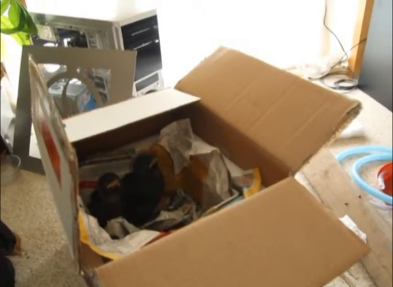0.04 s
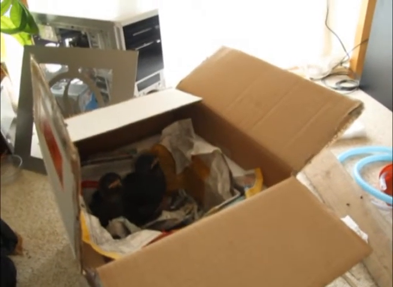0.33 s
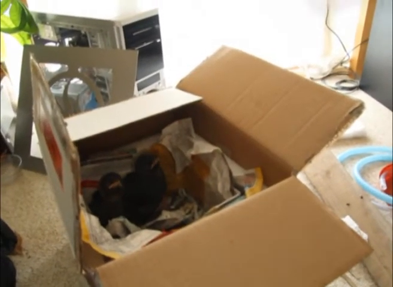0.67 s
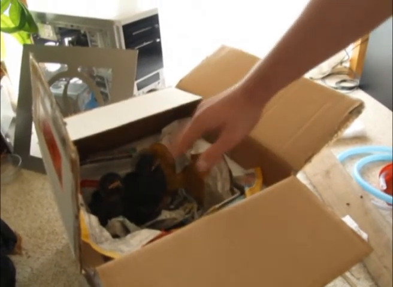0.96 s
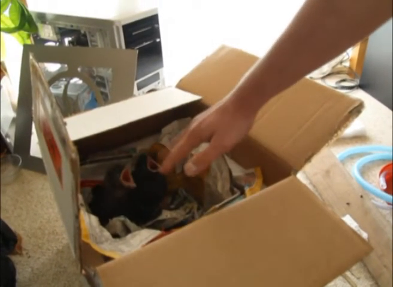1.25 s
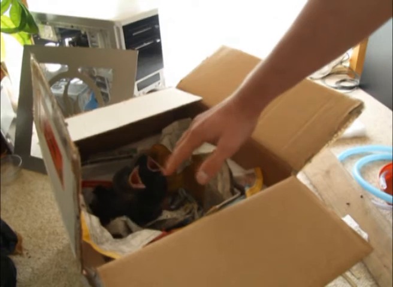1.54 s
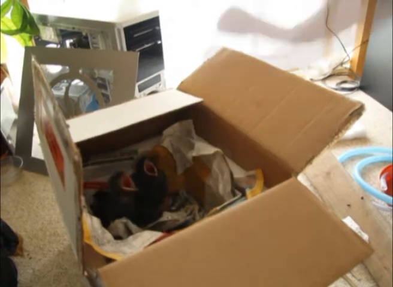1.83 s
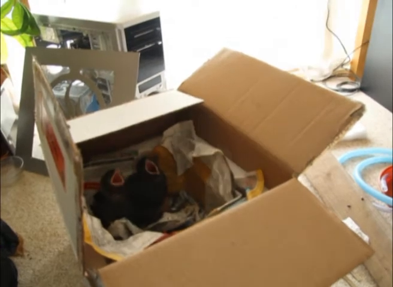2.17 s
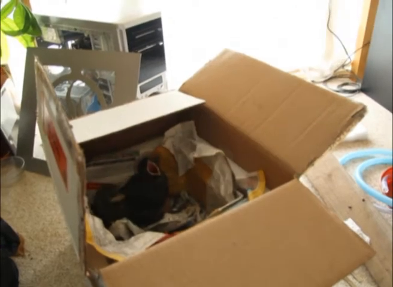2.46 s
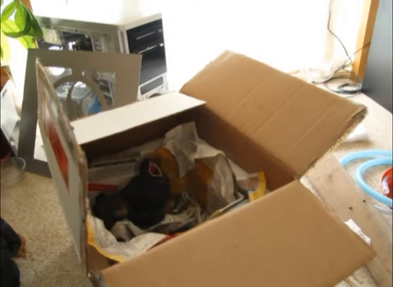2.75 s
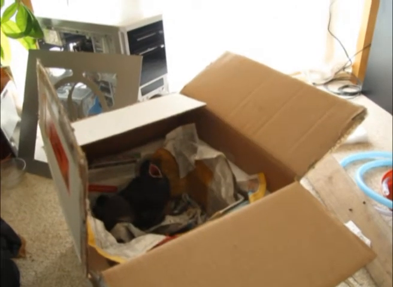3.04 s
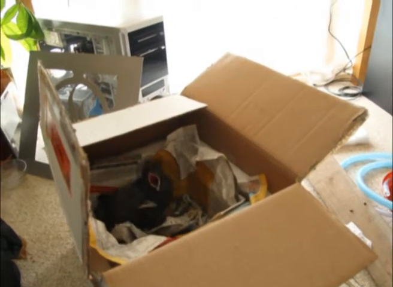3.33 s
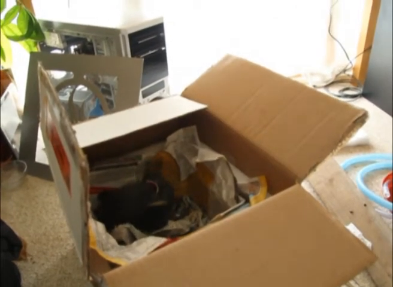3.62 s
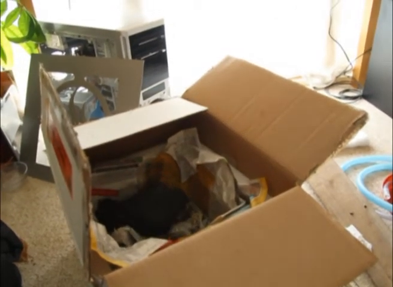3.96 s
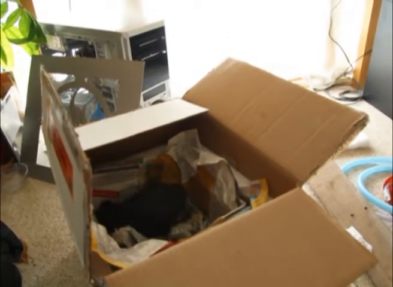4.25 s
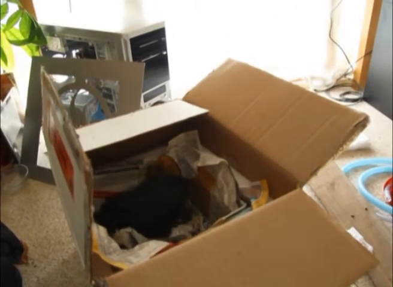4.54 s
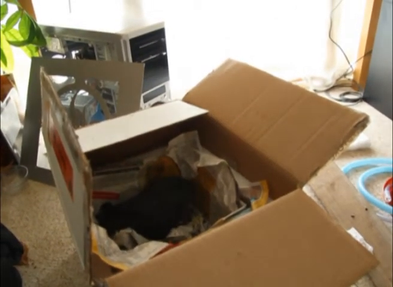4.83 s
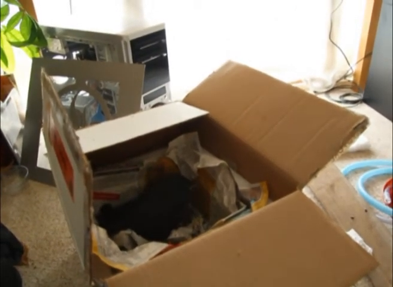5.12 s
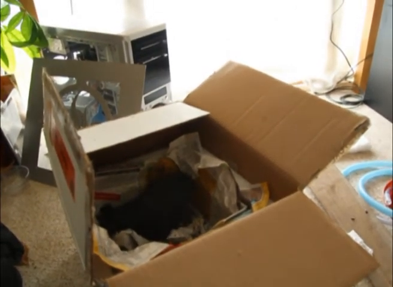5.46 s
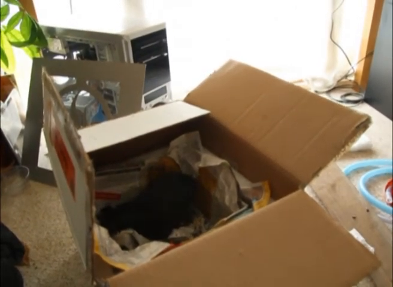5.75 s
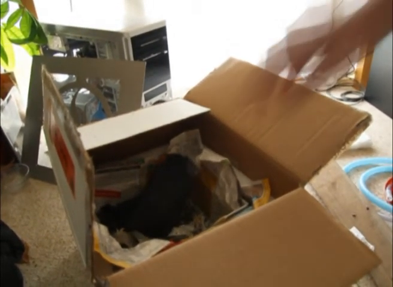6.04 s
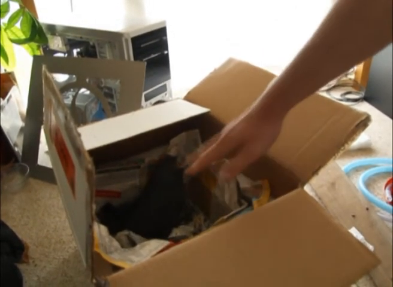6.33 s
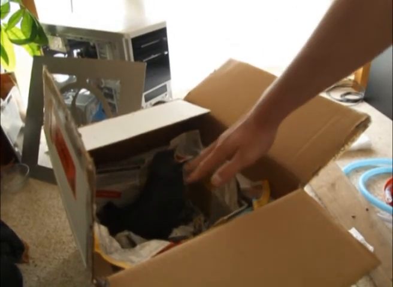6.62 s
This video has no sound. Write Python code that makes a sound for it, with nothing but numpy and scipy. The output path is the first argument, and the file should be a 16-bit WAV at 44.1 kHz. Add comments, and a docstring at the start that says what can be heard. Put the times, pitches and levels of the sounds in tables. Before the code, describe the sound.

Close, rasping squawks of hungry chicks in a cardboard box, pausing briefly for light shuffling on paper over a low room hum.

```python
"""Indoors, close to a cardboard box of jackdaw chicks, on one microphone. They beg from a hand with
seven loud squawks: each cracks open, locks briefly into a whistle or a buzz, then breaks into a
chaotic rasp. The chicks shuffle on paper bedding, clop their beaks and bump the box; clothes swish
over a low hum. The recorder's gain control clamps down on the squawks, then lets the room swell back."""
import sys
import numpy as np
from scipy import signal
from scipy.fft import rfft, irfft
from scipy.io import wavfile
from scipy.ndimage import uniform_filter1d, minimum_filter1d, map_coordinates

SR = 44100
rng = np.random.default_rng(int(sys.argv[2]) if len(sys.argv) > 2 else 0)


def int16_out(signal):
    """Quantize to a 16-bit WAV file."""
    q = np.round(np.clip(np.atleast_2d(signal).T, -1, 1) * 32767)
    wavfile.write(sys.argv[1], SR, q.astype(np.int16))


N = 295029
TIME = np.arange(N) / SR
FREQS = np.fft.rfftfreq(4096, 1 / SR)
SPLIT_HZ = 3500  # a sound's core lies below this, its treble above


def chicks():
    """Seven begging squawks, each through its own shape of throat and open beak."""
    # Each row: start and end in seconds, effort in dB, opening swell in dB, effort drift in dB/s,
    # treble against core in dB, its drift in dB/s, fade in seconds, throat lift and sag as fractions.
    calls = [(1.152, 1.785, -10.5, 15, -1.5, -0.5, -6, 0.012, .12, 0.04),
             (1.962, 2.258, -4.5, 17.5, -23.5, -3, -5.5, 0.025, 0, 0.01),
             (2.607, 3.005, -8.5, 15, -10, -1.15, -12, 0.016, 0.04, 0.03),
             (3.373, 4.055, -11, 13.5, 2, -4, -7, 0.018, 0.05, 0.04),
             (5.254, 5.578, -15, 14.5, -11.5, -.6, -27, 0.017, .01, .09),
             (5.976, 6.25, -14, 21.5, -11, -3.4, -17, 0.019, 0.04, 0.07),
             (6.321, 6.72, -10.5, 15.5, 15.5, -4.5, 0.5, 0.013, 0.06, 0.01)]
    # One list of resonances a squawk. Each row: centre in Hz, width in Hz, relative level in dB.
    throats = [
        [(645, 170, -27.5), (1600, 240, -7.5), (2043, 190, 0), (2580, 496, 1.2), (5070, 1500, -9.5),
         (5540, 390, -8), (6790, 290, -10.5), (8050, 1270, -12.5), (10220, 990, -15), (12700, 2100, -21)],
        [(645, 140, -35.5), (1370, 120, -24), (1990, 306, -11.5), (2690, 390, -4.5), (3900, 1000, -17.5),
         (5580, 950, -8.5), (7120, 480, -12), (8360, 1000, -14.5), (10110, 1300, -16.5), (12800, 2500, -22)],
        [(610, 180, -32.5), (1966, 216, -11.5), (2750, 516, -7.5), (3960, 350, -14.5), (5640, 770, -5.5),
         (7120, 650, -9.5), (8420, 840, -14), (10000, 2100, -15), (13710, 2400, -24)],
        [(663, 330, -29), (1440, 70, -22.5), (2104, 230, -0.9), (2650, 550, -3.5), (3830, 170, -15),
         (5440, 890, -11.5), (6830, 970, -13.5), (8450, 510, -17.5), (9550, 1470, -17.5), (12900, 2300, -26)],
        [(730, 293, -20), (1520, 370, -10), (1942, 266, -5.2), (2980, 340, -2), (3800, 850, -9.5),
         (4630, 140, -9), (6620, 1170, -0.5), (7850, 500, -8), (9100, 2050, -7), (13100, 1600, -16.5)],
        [(682, 210, -23.5), (1460, 260, -9.5), (2030, 470, -6.5), (3680, 1070, -9), (4370, 220, -16),
         (6070, 890, -11), (7400, 1840, -23), (9030, 580, -19), (12500, 770, -21.5), (14520, 2790, -37)],
        [(729, 230, -34), (1400, 184, -6), (2454, 566, 4.5), (3150, 440, -3), (3860, 520, -14),
         (4730, 880, -15.5), (5950, 1100, -10.5), (6640, 2700, -11.5), (9100, 3700, -18), (12030, 580, -24)],
    ]
    out = np.zeros(N)
    for call, throat in zip(calls, throats):
        add(out, call[0], squawk(throat, *call))
    return out


def squawk(throat, start, end, db, swell_db, drift, bright_db, bright_drift, fade, lift, sag):
    """Effort swells, drifts and fades while the syrinx slips between locked and chaotic states."""
    # The chick pushes or falters. Each row: centre and half width in seconds, change of effort in dB.
    surges = [(1.68, .04, 1), (2.071, 0.037, -2.1), (2.865, 0.029, -2.5), (3.796, 0.032, -5.5),
              (3.92, 0.059, 1.5)]
    swell_s, attack_s, release_s = 0.013, 0.0016, 0.011
    t = np.arange(start, end, 1 / SR)
    age, left = t - start, end - t
    fading = np.exp(-left / fade)
    effort = db - swell_db * np.exp(-age / swell_s) + drift * age - 17.5 * fading
    effort += sum(push_db * np.exp(-((t - s) / width) ** 2) for s, width, push_db in surges)
    crack_db = 9 * np.exp(-age / 0.038)  # extra treble as the beak snaps open
    bright = bright_db + bright_drift * age + crack_db - 7.5 * fading  # the treble fades first
    tension = 1 + lift * np.exp(-age / 0.09) - sag * np.exp(-left / 0.045)  # starts tight, ends slack
    hz, rough, fundamental_db, core_db, treble_db = syrinx(t)
    tone = locked_tone(t, throat, hz, rough, fundamental_db)
    core, treble = np.sqrt(1 - rough ** 2) * tone + rough * rasp(t, throat, tension)
    treble *= 1 - np.exp(-age / 0.0058)  # the pulses sharpen as pressure builds
    gate = np.clip(age / attack_s, 0, 1) * np.clip(left / release_s, 0, 1)
    return gate * amp(effort) * (amp(core_db) * core + amp(bright + treble_db) * treble)


def syrinx(t, lock_s=0.01):
    """Pitch, roughness and three levels of the voice: a free rasp, except in whistles and buzzes."""
    # Each row: start and end in seconds, top pitch in Hz, droop of the ends and roughness from 0 to 1,
    # then boosts of fundamental, core and treble in dB.
    whistles = [(1.169, 1.214, 1253, .05, 0.01, -9, 9, -1.5), (1.983, 2.01, 1289, 0.04, 0.25, -3, 4, -2),
                (2.629, 2.657, 1339, .07, 0, 2, 8.5, -4.5), (3.389, 3.436, 1330, .11, 0, -6, 8, 0.5),
                (5.266, 5.295, 1212, 0.03, 0.58, -25, 6.5, 0), (6.008, 6.035, 809, 0.05, 0.58, -13, 4, 1),
                (6.342, 6.363, 1363, 0, 0.5, -26, 5.5, -2), (6.52, 6.592, 1275, .06, 0.27, 0.5, 6, 4.5)]
    # Each row: start and end in seconds, first and last pitch in Hz, then roughness and boosts as above.
    buzzes = [(1.235, 1.324, 1241, 1161, 0.61, 13, 3, 4.5), (2.008, 2.046, 1219, 1125, 0.43, 9.5, -.5, -2),
              (2.662, 2.735, 1010, 896, 0.3, -5, -5.5, 1), (2.733, 2.797, 911.4, 897, 0.76, -13, 0.5, 5),
              (3.46, 3.516, 970, 982, 0.26, -2, -1, 6), (3.517, 3.615, 936, 878, 0.07, -16, -3, 8.5),
              (5.335, 5.539, 977, 923, 0.84, 8.5, -.5, 2), (5.54, 5.578, 891, 746, 0.58, -3, 4.6, -4),
              (6.04, 6.148, 1033, 992, .85, -8, 0, 3.5), (6.19, 6.244, 1692, 1638, 0.63, -25, -0.8, -5.5),
              (6.366, 6.426, 1376, 1306, 0.65, 11.5, 1.3, -2.7),
              (6.428, 6.475, 1229, 1186, 0.81, 14, 2.5, 1)]
    locks = []
    for start, end, top_hz, droop, *tone in whistles:
        progress = np.clip((t - start) / (end - start), 0, 1)
        arch = np.sin(np.pi * progress ** 0.7)  # rises faster than it falls
        locks.append((window(t, start, end, lock_s), top_hz * (1 - droop * (1 - arch)), tone))
    for start, end, first_hz, last_hz, *tone in buzzes:
        glide = np.clip((end - t) / (end - start), 0, 1) ** 1.3  # levels off
        locks.append((window(t, start, end, lock_s), last_hz + (first_hz - last_hz) * glide, tone))
    shares, pitches, tones = map(np.array, zip(*locks))
    hz = np.average(pitches, axis=0, weights=shares + 1e-9)
    rough, *levels = tones.T @ shares
    return hz, np.clip(rough + 1 - shares.sum(0), 0, 1), *levels


def locked_tone(t, throat, hz, rough, fundamental_db, odd_db=-4, second_db=5):
    """Periodic syrinx, as core and treble: strong and weak pulses alternate, so even harmonics lead."""
    jitter = (0.0044 + 0.0205 * rough ** 2) * wander(len(t), 383)
    phase = 2 * np.pi * np.cumsum(hz * (1 + jitter)) / SR
    k = np.arange(1, 19)[:, None]
    partials = np.sqrt(2) * np.sin(k * phase + 2 * np.pi * rng.random(k.shape))
    partials *= 1 + 0.16 * wander(len(t), 180)  # shimmer
    source_db = odd_db * (k % 2) + fundamental_db * (k == 1) + second_db * (k == 2)
    height = throat_gain(throat, k * hz) * amp(source_db) * (k * hz < SR / 2)
    sides = height * (k * hz < SPLIT_HZ), height * (k * hz >= SPLIT_HZ)
    return np.array([(h * partials).sum(0) / np.sqrt((h ** 2).sum(0) + 1e-12) for h in sides])


def rasp(t, throat, tension, pulse_hz=900, jitter=0.3, uneven_db=2, hiss=0.89):
    """Chaotic syrinx: uneven pulses, each with a puff of air, ring the throat's resonances."""
    count = 2 * len(t)
    turns = np.cumsum(pulse_hz * np.exp(jitter * wander(count, 700))) / SR
    pulses = np.diff(np.floor(turns), prepend=0) * amp(uneven_db * rng.standard_normal(count))
    puffs = np.exp(-(turns % 1)) * rng.standard_normal(count)
    flutter = amp(wander(count, 170))
    drive = (unit(pulses - pulses.mean()) + hiss * unit(puffs)) * flutter
    voice = colour(drive, 20 * np.log10(throat_gain(throat, FREQS)))
    # a tenser throat runs faster, which lifts all its resonances together
    return bands(map_coordinates(voice, [np.cumsum(tension)], order=5))


def throat_gain(throat, f, cut_hz=430):
    """Gain of the throat's resonances at the frequencies f; a small beak radiates no bass."""
    power = sum(amp(db) ** 2 / (1 + ((f - hz) / width) ** 2) ** 3 for hz, width, db in throat)
    return np.sqrt(power * f ** 6 / (f ** 6 + cut_hz ** 6) + 1e-9)


def bedding_and_beaks(rise_s=0.00066, crackles_per_s=4000):
    """Paper snaps and crackles underfoot, plus two low beak clops just before squawks."""
    # Each row: start in seconds, relative level in dB, treble boost in dB, decay in seconds.
    # The clops are the dull rows at 5.234 and 5.963 s.
    snaps_and_clops = [(2.354, -36, 1, 0.0058), (2.545, -39, 0.5, 0.0043), (3.205, -41.5, 9, 0.0066),
                       (3.328, -43.5, 4.5, 0.0078), (4.292, -41, -1, 0.0097), (4.421, -32, 0, 0.013),
                       (4.426, -23.5, -8, 0.0099), (4.511, -31.5, -8.5, 0.01), (4.635, -26.5, -7, 0.0064),
                       (4.685, -24, -7, 0.0028), (4.693, -23.5, -9, 0.006), (4.707, -27.5, -6, 0.0068),
                       (4.727, -25, -4, 0.003), (4.967, -32, -1, 0.014), (5.117, -37, -3, 0.006),
                       (5.187, -33, -11, 0.0052), (5.218, -13.5, -10, 0.0017), (5.234, -21, -18, 0.0035),
                       (5.243, -24, -5, 0.0075), (5.7, -29.5, -8.5, 0.0085), (5.759, -29, -10, 0.0063),
                       (5.902, -38, 4, 0.022), (5.963, -16, -18, 0.0053)]
    # The paper's spectrum, shared by the clops. Each row: frequency in Hz, relative level in dB.
    paper = [(120, -40), (200, -8.5), (467, -3), (963, -1.5), (1430, -3), (2800, -13.5), (3410, -8),
             (3730, -13), (4550, -12.5), (9380, -16), (11900, -17), (15000, -25.5)]
    # Spells of shuffling. Each row: start and end in seconds, level in dB.
    shuffles = [(2.944, 3.416, -54), (4.31, 4.802, -52), (4.947, 5.807, -51.5), (5.837, 6.683, -44)]
    paper_db = read(paper, FREQS)
    out, t = np.zeros(N), np.arange(SR // 8) / SR
    for s, db, treble_db, decay_s in snaps_and_clops:
        core, treble = bands(colour(rng.standard_normal(len(t)), paper_db))
        shape = np.minimum(t / rise_s, 1) * np.exp(-t / decay_s)
        add(out, s, amp(db - 8) * shape * (core + amp(treble_db + 3.5) * treble))
    crackles = rng.standard_normal(N) * (rng.random(N) < crackles_per_s / SR)
    shuffling = sum(amp(db) * window(TIME, start, end, ramp=0.14) for start, end, db in shuffles)
    return out + shuffling * unit(colour(crackles, paper_db))


def box(push_s=0.0066):
    """Short scuffing pushes ring the cardboard's dull modes."""
    # Each row: start in seconds, peak level at the box in dB.
    bumps = [(1.397, -27.5), (1.76, -24), (3.865, -22.5), (4.057, -27.5), (4.425, -38), (4.525, -45),
             (4.641, -45), (4.697, -29), (4.784, -44), (4.945, -42), (5.14, -41), (5.963, -47), (6.5, -29)]
    # Each row: frequency in Hz, relative level in dB, seconds to fall 60 dB.
    modes = [(88, -23, 0.23), (125, -25, 0.14), (215, -5.5, 0.044), (353, -3, 0.047), (552, -7.5, 0.048),
             (657, 6.5, 0.024), (940, -20, .05)]
    out, t = np.zeros(N), np.arange(SR // 5) / SR
    ring = sum(amp(db - 60 * t / t60) * np.cos(2 * np.pi * hz * t) for hz, db, t60 in modes)
    for s, db in bumps:
        scuff = t / push_s * np.exp(-t / push_s) * rng.standard_normal(len(t))
        bump = signal.fftconvolve(scuff, ring)[:len(t)]
        add(out, s, amp(db) * bump / abs(bump).max())
    return out


def clothes():
    """Cloth swishes as the arm reaches in."""
    # The cloth's spectrum. Each row: frequency in Hz, relative level in dB.
    cloth = [(100, -37), (1500, -8.5), (4000, -13.5), (7000, -14.5), (11000, -16.5), (15000, -26)]
    # Each row: centre and half width in seconds, level in dB.
    reaches = [(.88, 0.34, -53), (6.1, 0.24, -45)]
    motion = sum(amp(db) * np.exp(-((TIME - s) / width) ** 2) for s, width, db in reaches)
    return motion * unit(colour(rng.standard_normal(N), read(cloth, FREQS)))


def room_tone(air_db=-48.5, hum_db=-55, waver_hz=1.27):
    """Steady room air with a low, wavering hum."""
    # The air's spectrum and the hum's tones. Each row: frequency in Hz, relative level in dB.
    air_spectrum = [(10, -52.5), (25, -23.5), (50, -6.5), (100, -1.5), (160, -3.5), (230, -0.5), (420, -3),
                    (900, -3.5), (1200, -8.5), (2500, -12.5), (3800, -19.5), (6400, -24), (16000, -35)]
    hum_tones = [(120, -4.5), (189, -4.5)]
    out = amp(air_db) * unit(colour(rng.standard_normal(N), read(air_spectrum, FREQS)))
    for hz, db in hum_tones:
        phase = 2 * np.pi * np.cumsum(hz + waver_hz * wander(N, 10)) / SR
        out += amp(hum_db + db) * np.sqrt(2) * np.sin(phase)
    return out


def room(x, build_s=0.0026):
    """The path to the microphone: direct sound, close echoes and a short diffuse tail."""
    # Each row: frequency in Hz, seconds for the tail to fall 60 dB.
    decay_times = [(200, 0.17), (1000, 0.38), (2500, 0.32), (6000, 0.34), (10000, 0.37), (16000, 0.22)]
    # Each row: frequency in Hz, relative level of the tail in dB.
    tail_levels = [(200, -26.5), (1000, -3.5), (2500, -9), (4500, -7.5), (9000, -14.5), (16000, -17)]
    # Off the box flaps and the table. Each row: delay in seconds, gain.
    echoes = [(.0015, 0.074), (.0037, 0.04), (.0069, 0.11), (.0075, 0.076), (0.0099, -.09), (0.0152, 0.19)]
    hz, t, noise = signal.stft(rng.standard_normal(SR), SR, nperseg=256)
    t60 = read(decay_times, hz)[:, None]
    fade = amp(-60 * t / t60) * (1 - np.exp(-t / build_s))
    fade *= amp(read(tail_levels, hz))[:, None] / np.sqrt(SR * np.mean(fade ** 2, 1, keepdims=True))
    response = signal.istft(noise * fade, SR, nperseg=256)[1]
    for s, gain in [(0, 1), *echoes]:
        add(response, s, np.array([gain]))
    return signal.fftconvolve(x, response)[:N]


def gain_control(x, threshold_db=-15.5, ratio=5.4, attack_s=0.012, recover_db_per_s=15.5):
    """The recorder turns a loud sound down quickly and recovers slowly."""
    level_db = 10 * np.log10(abs(uniform_filter1d(x[0] ** 2, size=660)) + 1e-12)
    excess_db = np.maximum(level_db - threshold_db, 0) * (1 - 1 / ratio)
    recovery = recover_db_per_s * TIME
    held_db = np.maximum.accumulate(excess_db + recovery) - recovery
    keep = np.exp(-1 / (attack_s * SR))
    return x * amp(-signal.lfilter([1 - keep], [1, -keep], held_db))


def amp(db):
    """Decibels to gain."""
    return 10 ** (np.asarray(db) / 20)


def unit(x):
    """Scales to rms 1."""
    return x / np.sqrt(np.mean(x ** 2) + 1e-20)


def read(points, hz):
    """Interpolates a table on a log-frequency axis."""
    f, value = np.transpose(points)
    return np.interp(np.log(hz + 1), np.log(f + 1), value)


def add(mix, s, sound):
    """Mixes a sound in at s seconds."""
    part = mix[max(round(s * SR), 0):][:len(sound)]
    part += sound[:len(part)]


def colour(x, db):
    """Causal filter with the gain db at FREQS."""
    log_gain = np.log(amp(np.r_[db, db[-2:0:-1]]))
    taps = np.fft.ifft(np.exp(np.conj(signal.hilbert(log_gain)))).real
    return signal.fftconvolve(x, taps[:len(FREQS)])[:len(x)]


def wander(count, hz):
    """Smooth random motion of rms 1, up to about hz."""
    f = np.fft.rfftfreq(count, 1 / SR)
    return unit(irfft(rfft(rng.standard_normal(count)) * np.exp(-(f / hz) ** 2) * (f > 0), count))


def bands(x):
    """The core and the treble of a sound, each at rms 1."""
    low = 1 / (1 + (np.fft.rfftfreq(len(x), 1 / SR) / SPLIT_HZ) ** 16)
    core = irfft(rfft(x) * low, len(x))
    return np.array([unit(core), unit(x - core)])


def window(t, start, end, ramp):
    """1 between start and end, with straight ramps across the edges."""
    return np.clip(0.5 + np.minimum(t - start, end - t) / ramp, 0, 1)


def scene():
    """Chicks, bedding and box in the room, with clothes and room tone, in mono."""
    return (room(chicks() + bedding_and_beaks() + box()) + clothes() + room_tone())[None]


def record(dry, ceiling=0.93, edge_hz=16050):
    """The recorder: gain control, a fast peak limiter, then the band limit."""
    levelled = gain_control(dry)
    headroom = np.minimum(1, ceiling / (abs(levelled) + 1e-9))
    gain = uniform_filter1d(minimum_filter1d(headroom, size=181), size=181)
    lowpass = signal.firwin(301, edge_hz, window=("kaiser", 9), fs=SR)
    return signal.oaconvolve(levelled * gain, lowpass[None], "same")


dry = scene()
out = record(dry)
int16_out(out)
```